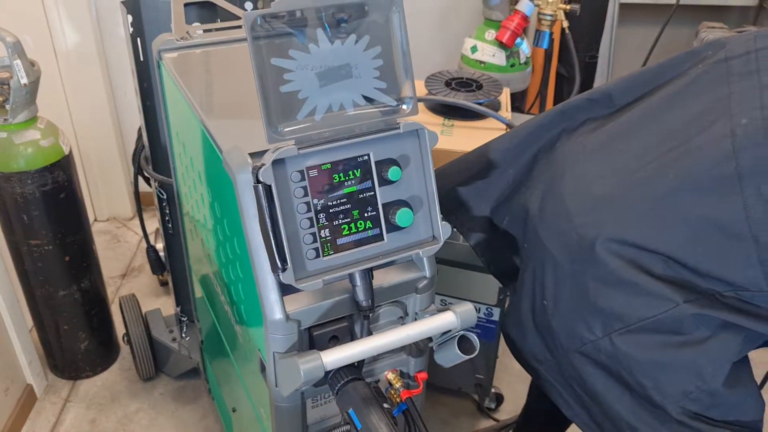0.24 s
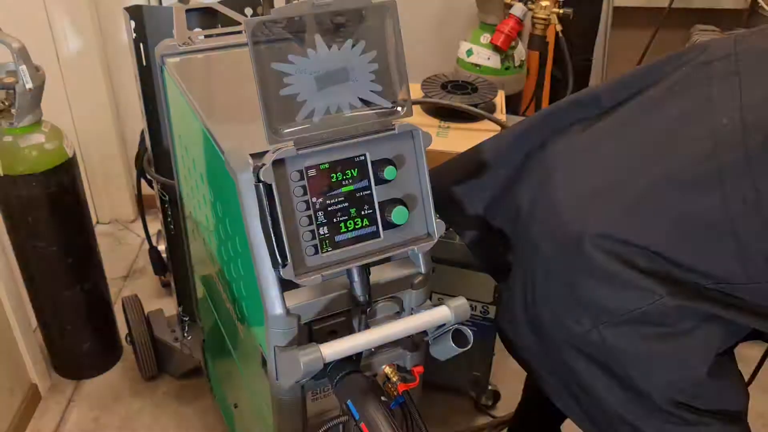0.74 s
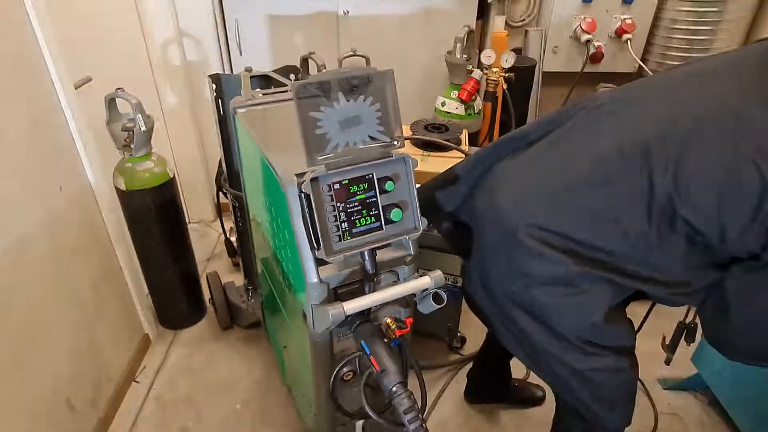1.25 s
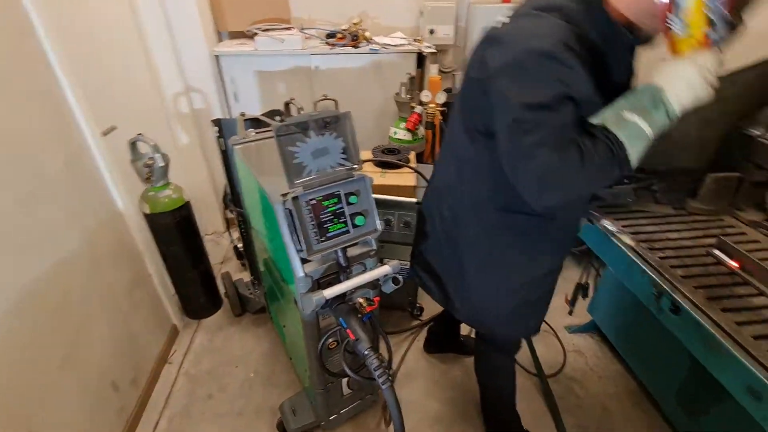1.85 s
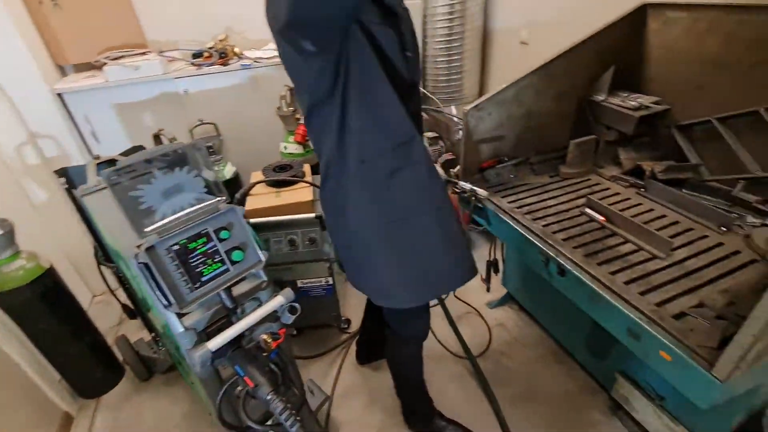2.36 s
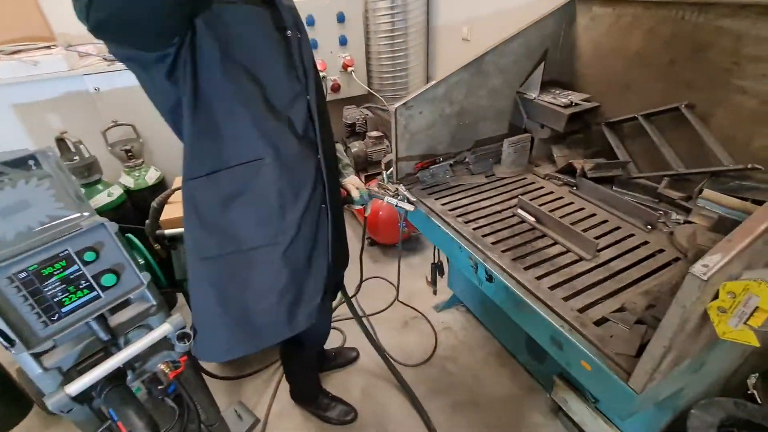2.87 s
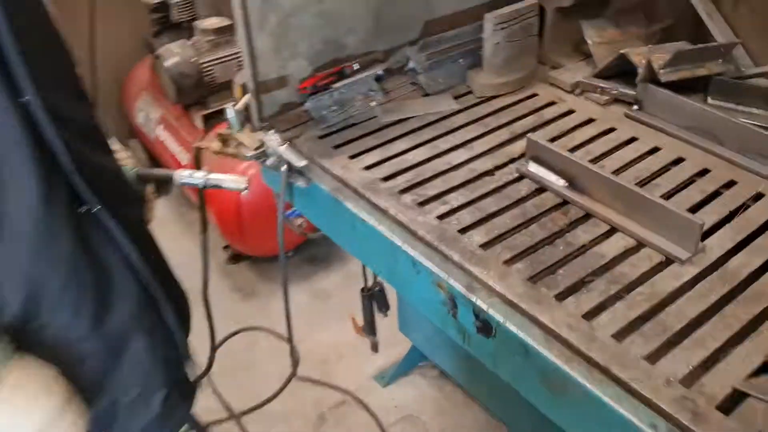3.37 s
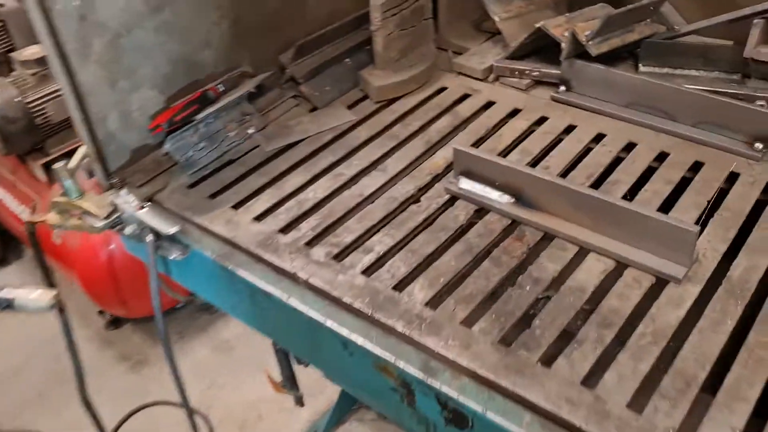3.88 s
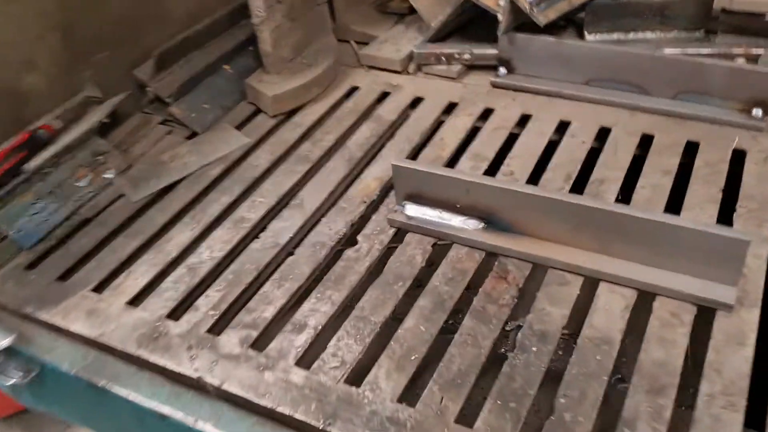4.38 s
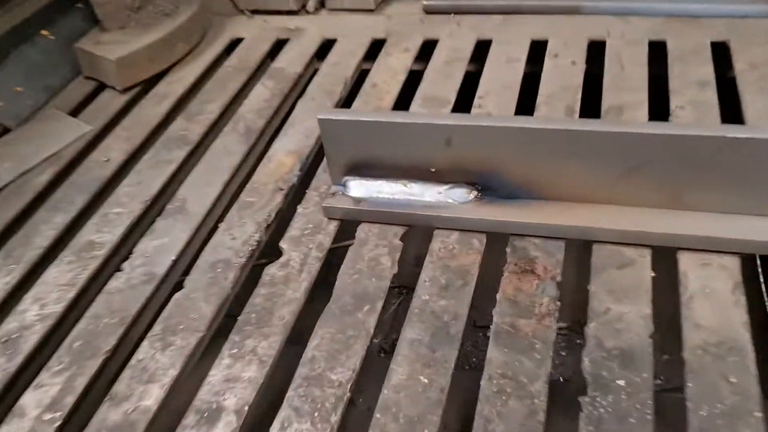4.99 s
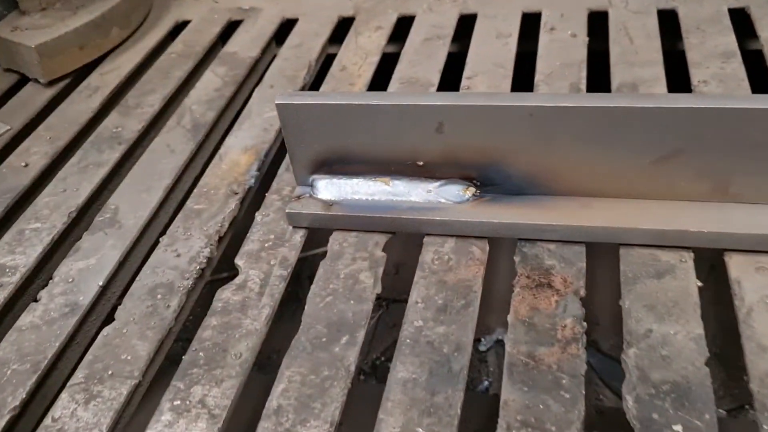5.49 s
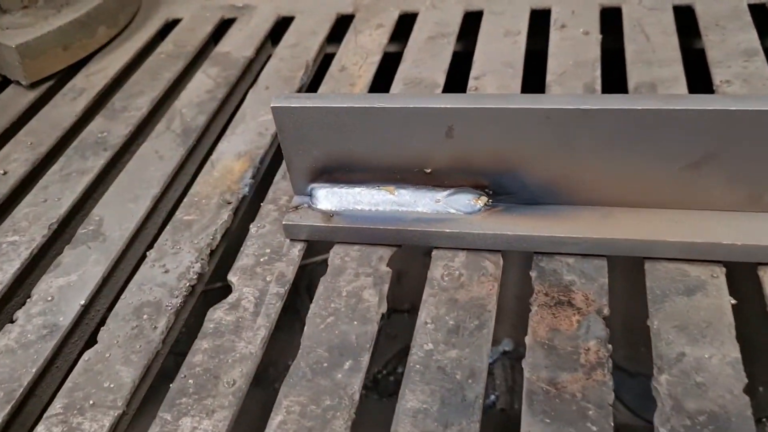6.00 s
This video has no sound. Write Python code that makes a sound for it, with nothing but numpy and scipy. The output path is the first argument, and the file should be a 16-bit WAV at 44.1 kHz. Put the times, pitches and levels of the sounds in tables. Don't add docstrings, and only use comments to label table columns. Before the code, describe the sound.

In a small workshop, a pulsed welding arc buzzes loudly with a steady, raspy pitch and sizzle, then slows, crackles and cuts out. Shielding gas keeps hissing, growing brighter and closer until it stops abruptly. A thin pump whine, cooling air and low fan rumble continue, with soft knocks, cloth rustles and small metal ticks. A handheld stereo microphone moves from the machine toward the bench.

```python
import sys
import numpy as np
from scipy import signal
from scipy.fft import rfft, irfft, next_fast_len
from scipy.io import wavfile
from scipy.ndimage import uniform_filter1d, map_coordinates

SR = 44100
rng = np.random.default_rng(int(sys.argv[2]) if len(sys.argv) > 2 else 0)


def volts_from_decibels(level):
    exponent = np.asarray(level, float) / 20
    return 10 ** exponent


def output_pcm(signal):
    pcm = np.clip(np.atleast_2d(signal).T, -1, 1) * 32767
    wavfile.write(sys.argv[1], SR, np.round(pcm).astype(np.int16))


N = 275184
TIME = np.arange(N) / SR

# (time [s], pulse rate [Hz])
PULSE_STEPS = [
    (0, 244.8),
    (.457, 241.2),
    (.52, 229),
    (.573, 179.7),
    (.622, 148.7),
    (.674, 128),
]
# (frequency [Hz], left level [dB], right level [dB])
BENCH_MODES = [(140, -37, -36), (249, -20.5, -23.5), (350, -35, -34), (447, -29, -27), (490, -40, -34),
               (695, -27, -33), (905, -26, -25), (975, -23, -23), (1045, -20, -24), (1190, -20, -25),
               (1335, -20, -21), (1465, -24, -27), (1612, -27, -15), (1706, -21, -12), (1805, -30, -17),
               (2195, -33, -30), (2448, -40, -32), (2693, -45, -30), (2930, -35, -32), (3182, -45, -27),
               (3420, -33, -26), (3917, -31, -34), (4162, -31, -31), (4651, -31, -29), (4896, -30, -33),
               (5386, -30, -33), (8323, -38, -41), (9792, -49, -35), (11016, -47, -35), (11600, -45, -33)]
# (frequency [Hz], level [dB])
EDGE_SPECTRUM = [(100, -60), (600, -42), (2000, -44), (3200, -38), (4400, -46), (5600, -40), (6900, -35),
                 (7600, -41), (9000, -43), (12000, -41), (16000, -52)]
# (frequency [Hz], density [dB per Hz])
SIZZLE_SPECTRUM = [(200, -24), (800, -16), (1300, -3), (1700, -1), (2300, -6), (3400, -5), (3750, -12),
                   (4400, -17), (5300, -6), (6400, -16), (7600, -19), (8600, -5), (11800, -1), (15900, -9)]
# (frequency [Hz], phase by which left leads [rad])
ARC_LEAD = [(0, 0), (300, -.1), (730, -2.7), (960, -2), (1200, -2.3), (1450, -3), (1800, -3.3), (2200, -6),
            (2670, -7), (3620, -6.9), (4400, -9.8), (5390, -12.6), (8100, -17.5), (15700, -35.2)]
# (time [s], peak level [dB])
DROPLETS = [(0.572, -13), (0.5865, -16), (0.606, -15), (0.6434, -14), (0.6667, -16), (0.6817, -14),
            (0.6981, -18)]
# (frequency [Hz], density [dB per Hz])
JET_SPECTRUM = [(2590, -56), (4400, -14), (4770, -11), (6040, -3), (6730, -5), (8220, -1.5), (9550, -4.5),
                (11800, -10.5), (14500, -11), (15900, -18.5)]
# (frequency [Hz], density [dB per Hz])
NOZZLE_SPECTRUM = [(590, -38), (1000, -25), (1530, -10), (1830, -1.5), (2140, -9.5), (2660, -15),
                   (3130, -13.5), (4800, -23), (6240, -45), (10600, -120)]
# (time [s], distance [m])
TORCH_DISTANCE = [(.8, 2.2), (1.4, 2.42), (2.0, 1.56), (2.7, 1.33), (3.0, 1.37), (3.5, 1.09), (4.0, 1.04),
                  (4.3, 0.94)]
# (time [s], level [dB])
PUMP_LEVEL = [(.85, -54.5), (1.6, -52.5), (2.05, -44.5), (2.5, -52), (2.9, -48.5), (3.27, -53), (3.55, -44),
              (3.95, -48.5), (4.29, -45.5), (4.45, -50), (5.23, -48.5), (6.24, -51.5)]
# (multiple [1], left level [dB], right level [dB])
VANE_OVERTONES = [(1, -6, 2), (2, -18, -15), (3, -19, -20), (4, -23, -22), (5, -24, -23), (6, -21, -21),
                  (8, -28, -28)]
# (time [s], distance [m])
EXTRACTOR_DISTANCE = [(.85, 3), (2, 3.1), (3, 2.35), (3.8, 1.7), (4.25, 1.9), (4.5, 1.2), (5.1, 1.07),
                      (5.7, 0.93), (6.24, 0.6)]
# (frequency [Hz], density [dB per Hz])
RUMBLE_SPECTRUM = [(15, -51), (25, -23), (81, 1), (101, 3.5), (124, -15), (160, -9.5), (210, -18),
                   (350, -120)]
# (frequency [Hz], density [dB per Hz])
AIR_SPECTRUM = [(80, -15.5), (130, -8.5), (228, -12), (393, -4.5), (600, -14.5), (934, -14.5), (1200, -13),
                (1850, -15), (2300, -21.5), (3500, -26), (4600, -31), (5400, -34), (12000, -35),
                (15900, -36)]
# (frequency [Hz], level [dB])
MAINS_HUM = [(300.5, -60), (635.5, -66), (1200.6, -61)]
# (time [s], peak level [dB], frequency [Hz], decay time t60 [s])
CONTACTS = [(1.799, -43.5, 1190, 0.04), (1.884, -38, 580, 0.057), (2.314, -36, 1350, 0.06),
            (2.4, -36, 444, 0.042), (2.499, -38, 436, 0.04), (2.659, -38, 406, 0.03),
            (4.5614, -46.5, 3300, 0.023), (5.0074, -54, 3980, 0.02), (5.3393, -41, 2820, 0.016),
            (5.4046, -41.5, 3340, 0.017), (5.4734, -50, 3650, 0.02)]
# (middle [s], half length [s], level [dB])
RUSTLES = [
    (2.03, .015, -41),
    (2.67, 0.033, -42.5),
    (4.45, 0.076, -55.5),
    (5.12, 0.22, -64),
    (5.345, 0.0092, -49),
    (5.68, 0.11, -55),
    (5.89, 0.073, -54.5),
]
# (frequency [Hz], density [dB per Hz])
CLOTH_SPECTRUM = [(500, -30), (1200, -12), (3000, 0), (4500, -5), (6000, -7), (12000, -8), (16000, -16)]
# (frequency [Hz], left-right likeness [1])
LIKENESS = [(60, 0.95), (130, 1), (290, 0.91), (640, 0.89), (1410, 0.062), (3100, 0.12), (6820, 0.039),
            (15000, 0)]
# (frequency [Hz], left minus right [dB])
BALANCE = [(60, -1.0), (110, -1.0), (200, 1), (380, -1), (700, 1), (1290, -5.5), (2380, -4), (4400, 1.5),
           (8120, -3), (15000, -1.5)]
# (frequency [Hz], decay time t60 [s])
SHOP_DECAY = [(150, 0.081), (1000, 0.3), (4000, 0.33), (12000, 0.1)]

BUZZ_DB, SIZZLE_DB, KICK_GROWS_DB = -27, -25.5, 5.5
SURGE_S, SURGE_WIDTH_S, SURGE_DB = .49, 0.054, 2
FADE_DB_PER_S, FLARE_FADE_DB_PER_S = 123, 14
ARC_OUT_S = .698
JET_DB, NOZZLE_DB, HIDDEN_DB, IN_VIEW_S = -39.5, -42.5, -9, (0.95, 1.88)
VALVE_SHUT_S = 4.33
VANES, VANE_HZ = 40, 1886
THROB_SHARE, THROB_ENDS_S = .5, (3.2, 3.6)
RUMBLE_DB, SURGING_DB = -38, 1.5
AIR_DB, AIR_BEHIND_DB, TURN_S = -43.5, -1.23, 2.8


def unit(x):
    return x / np.sqrt(np.mean(x ** 2) + 1e-20)


def along(points, hz):
    f, v = np.transpose(points)
    return np.interp(np.log(hz + 1), np.log(f + 1), v)


def curves(rows):
    s, *cols = np.transpose(rows)
    return [np.interp(TIME, s, c) for c in cols]


def ramp(start, end):
    return np.clip((TIME - start) / (end - start), 0, 1)


def wobble(rate):
    return map_coordinates(rng.standard_normal(int(N * rate / SR) + 4), [TIME * rate])


def filtered(x, response):
    m = 2 * next_fast_len(N // 2 + SR // 4)
    return irfft(rfft(x, m) * response(np.fft.rfftfreq(m, 1 / SR)), m)[..., :N]


def causal(gain):
    cepstrum = irfft(np.log(gain + 1e-6))
    half = cepstrum.shape[-1] // 2
    cepstrum[..., 1:half] *= 2
    cepstrum[..., half + 1:] = 0
    return np.exp(rfft(cepstrum))


def rush(spectrum, patchy_db):
    z = signal.stft(rng.standard_normal((2, N + 512)), nperseg=512)[2]
    patches = uniform_filter1d(rng.standard_normal(z.shape[1:]), 3, 0)
    patches = uniform_filter1d(patches, 24, 1)
    pair = signal.istft(z * volts_from_decibels(patchy_db * unit(patches)), nperseg=512)[1][:, :N]

    def spread(hz):
        turn = np.arccos(np.clip(along(LIKENESS, hz), -1, 1)) / 2
        return volts_from_decibels(along(spectrum, hz)) * [np.cos(turn), np.sin(turn)]

    def lean(hz):
        return volts_from_decibels(np.outer([.5, -.5], along(BALANCE, hz)))

    mid, side = filtered(pair, spread)
    return unit(filtered(np.array([mid + side, mid - side]), lean))


def shop(x):
    hz, t, z = signal.stft(rng.standard_normal((2, SR // 2)), SR, nperseg=256)
    decay = volts_from_decibels(-60 * t / along(SHOP_DECAY, hz)[:, None])
    tail = signal.istft(z * decay, SR, nperseg=256)[1]
    tail = tail / np.linalg.norm(tail[0])
    return signal.fftconvolve(np.pad(x, ((0, 0), (200, 0))), tail, axes=1)[:, :N]


def arc():
    ahead = SR // 10
    time = TIME - ahead / SR
    start, rate = np.transpose(PULSE_STEPS)
    pace = rate[np.maximum(np.searchsorted(start, time, "right") - 1, 0)]
    surge_db = SURGE_DB * np.exp(-((time - SURGE_S) / SURGE_WIDTH_S) ** 2)
    since_surge = np.maximum(time - SURGE_S, 0)
    buzz_db = BUZZ_DB + surge_db + KICK_GROWS_DB * np.log2(rate[0] / pace)
    sizzle_db = SIZZLE_DB + surge_db - FADE_DB_PER_S * since_surge
    flare_db = SIZZLE_DB + surge_db - FLARE_FADE_DB_PER_S * since_surge

    cycles = np.cumsum(pace) / SR
    last = np.interp(ARC_OUT_S, time, cycles)
    when = np.interp(last - np.arange(int(last))[::-1], cycles, TIME)
    chance = rng.standard_normal((len(when), 3))
    starved = 1 - np.interp(when, TIME, pace) / rate[0]
    place = (when + (2.5e-6 + 2e-4 * starved) * chance[:, 0]) * SR

    cells = place.astype(int)[:, None] + np.arange(-8, 9)
    offset = cells - place[:, None]
    uneven_db = (.4 + 4 * starved[:, None]) * chance[:, 1:2]
    kicks = np.sinc(offset) * np.cos(offset * np.pi / 18) ** 2 * volts_from_decibels(uneven_db)
    pulses = np.bincount(cells.ravel(), kicks.ravel(), N)
    pulses = pulses * volts_from_decibels(buzz_db + 25.5) * SR / (2 * rate[0])
    echoes = rng.standard_normal(SR // 5) * volts_from_decibels(-60 * TIME[:SR // 5] / .07)
    scatter = np.r_[8, echoes]

    def bench(hz):
        power = volts_from_decibels(2 * along(EDGE_SPECTRUM, hz)) * np.ones((2, 1))
        for centre, *db in BENCH_MODES:
            detuning = (hz - centre) / max(26, .018 * centre)
            power = power + volts_from_decibels(2 * np.array(db))[:, None] / (1 + detuning ** 2) ** 2
        smear = rfft(scatter, 2 * len(hz) - 2)
        phase = causal(np.sqrt(power.sum(0))) * smear / causal(abs(smear))
        return np.sqrt(power) * phase / abs(phase)

    def lead(hz):
        return np.exp(1j * np.outer([1, 0], along(ARC_LEAD, hz)))

    flare = np.exp(-np.arange(400) / SR / 0.00064)
    edges = np.bincount(place.astype(int), volts_from_decibels(2.5 * chance[:, 2]), N)
    falling = 0.089 * np.roll(edges, round(.0025 * SR))
    edges = (edges + falling) * volts_from_decibels(flare_db + 6.5)
    for s, db in DROPLETS:
        edges[ahead + round(s * SR)] += volts_from_decibels(db + 4)
        pulses[ahead + round(s * SR)] += volts_from_decibels(db + 43.0)
    steady = 0.35 * volts_from_decibels(sizzle_db + 6.5) * (time < ARC_OUT_S)
    gate = steady + np.convolve(edges, flare)[:N]
    noise = unit(filtered(rng.standard_normal(N), lambda hz: volts_from_decibels(along(SIZZLE_SPECTRUM, hz))))

    buzz = filtered(filtered(pulses, bench), lead)
    sizzle = filtered(gate * noise * volts_from_decibels([[-3], [3]]), lead)
    heard = buzz + sizzle + shop(volts_from_decibels(-18) * buzz + volts_from_decibels(-2) * sizzle)
    return np.pad(heard[:, ahead:], ((0, 0), (0, ahead)))


def gas():
    shut_db = np.clip((TIME - VALVE_SHUT_S) * -260, -60, 0) - 4 * (TIME > VALVE_SHUT_S)
    jet = rush(JET_SPECTRUM, patchy_db=2.1)
    top = filtered(jet, lambda hz: 1 / (1 + (6500 / (hz + 1)) ** 8))
    jet = jet + (volts_from_decibels(HIDDEN_DB * (1 - ramp(*IN_VIEW_S))) - 1) * top
    nozzle = volts_from_decibels(NOZZLE_DB + 0.7 * wobble(6)) * rush(NOZZLE_SPECTRUM, patchy_db=2.0)
    flow = volts_from_decibels(JET_DB + 0.39 * wobble(5.43)) * jet + nozzle
    return flow * volts_from_decibels(shut_db + 0.98 * wobble(12)) / curves(TORCH_DISTANCE)[0]


def pump():
    tone_db = curves(PUMP_LEVEL)[0]
    throb = THROB_SHARE * (1 - ramp(*THROB_ENDS_S))
    vane_hz = VANE_HZ * (1 + 0.000402 * wobble(20))
    shaft = 2 * np.pi * np.cumsum(vane_hz) / SR / VANES
    swing = .42 * np.sin(shaft) + .25 * np.sin(2 * shaft)
    whine = 0
    for k, left, right in VANE_OVERTONES:
        level = volts_from_decibels(np.c_[[left, right]] + (.6 + .3 * k) * wobble(3))
        phase = k * VANES * shaft + k ** .6 * swing + np.c_[[.9, 0]]
        whine = whine + level * np.sin(phase)
    return np.sqrt(2) * volts_from_decibels(tone_db) * (1 + throb * np.cos(shaft)) * whine


def fans():
    rumble = volts_from_decibels(RUMBLE_DB + SURGING_DB * wobble(8)) / curves(EXTRACTOR_DISTANCE)[0]
    walk_db = -2.5 * (1 - ramp(.8, 1.6)) + AIR_BEHIND_DB * ramp(TURN_S, TURN_S + .3)
    air = volts_from_decibels(AIR_DB + walk_db + .4 * wobble(7))
    hum = 0
    for hz, db in MAINS_HUM:
        hum = hum + volts_from_decibels(db + 1.5 + 4.1 * wobble(7.2)) * np.sin(2 * np.pi * hz * TIME)
    low = rumble * rush(RUMBLE_SPECTRUM, patchy_db=0.8) + air * rush(AIR_SPECTRUM, patchy_db=1.96)
    return filtered(low, lambda hz: np.exp(-2j * np.pi * hz * np.c_[[0, .00022]])) + hum


def handling():
    ticks = np.zeros(N + SR)
    t = np.arange(SR // 5) / SR
    for s, db, hz, t60 in CONTACTS:
        dull = signal.butter(1, min(hz ** 2 / 900, 12000), fs=SR, output="sos")
        puff = unit(signal.sosfilt(dull, rng.standard_normal(len(t))))
        ring = 1.13 * np.sin(2 * np.pi * hz * t) + puff * (1 - np.exp(-t / 0.00087))
        ticks[round(s * SR):][:len(t)] += volts_from_decibels(db - 60 * t / max(t60, .005)) * ring
    ticks = ticks[None, :N]
    stirring = sum(volts_from_decibels(db) * np.exp(-((TIME - s) / half) ** 2) for s, half, db in RUSTLES)
    grains = unit(volts_from_decibels(2.3 * wobble(150)) * rush(CLOTH_SPECTRUM, patchy_db=1.0))
    return ticks + volts_from_decibels(0.5) * shop(ticks) + stirring * grains


def scene():
    return arc() + gas() + pump() + fans() + handling()


def top_cut(x):
    return signal.sosfilt(signal.butter(12, 16080, fs=SR, output="sos"), x)


def record(dry):
    shaded = filtered(dry, lambda hz: volts_from_decibels(-3 * np.exp(-((hz - 4550) / 550) ** 2)))
    rounded = shaded / (1 + abs(shaded / .78) ** 4) ** .25
    return top_cut(rounded)


dry = scene()
out = record(dry)
output_pcm(out)
```